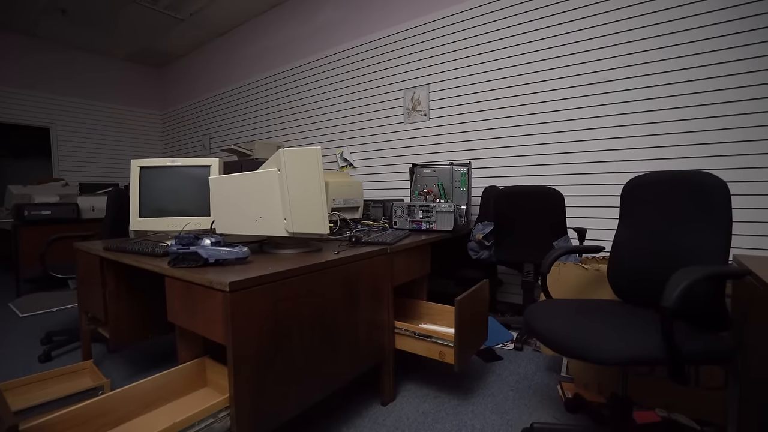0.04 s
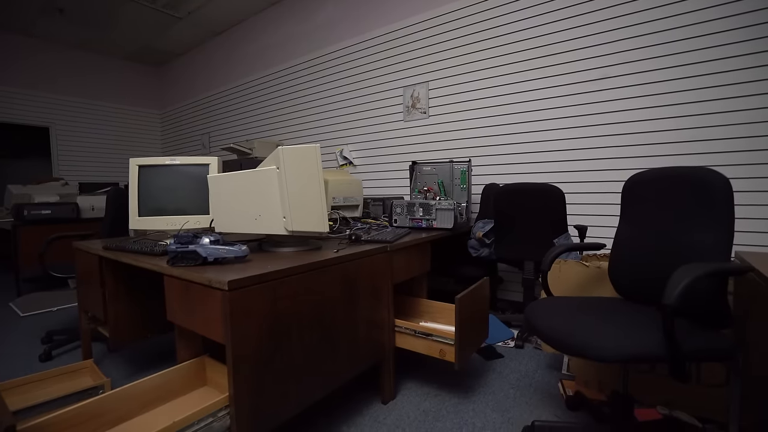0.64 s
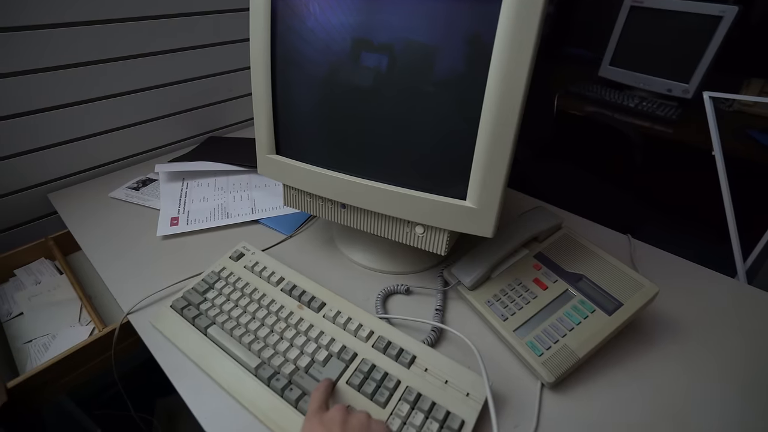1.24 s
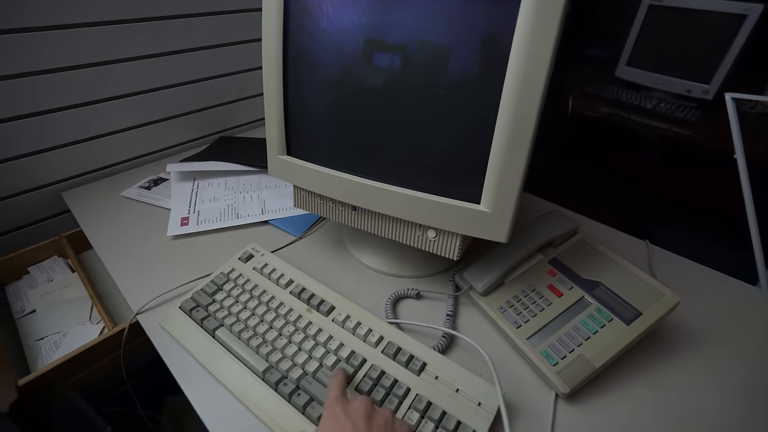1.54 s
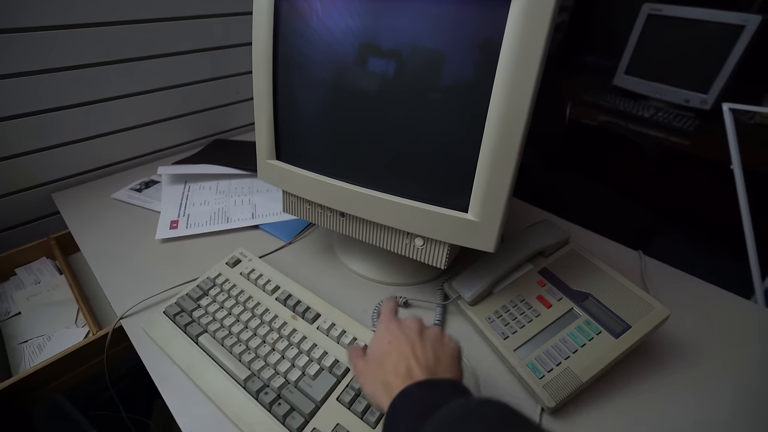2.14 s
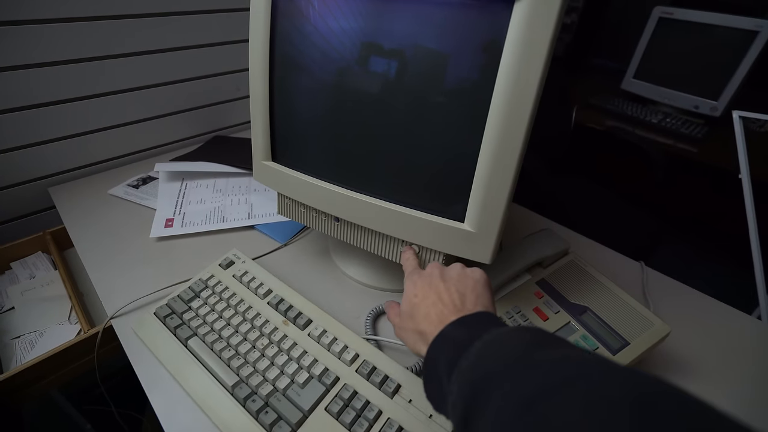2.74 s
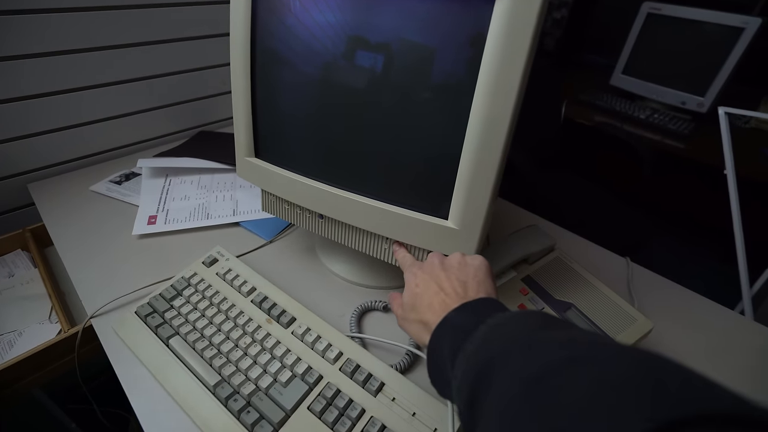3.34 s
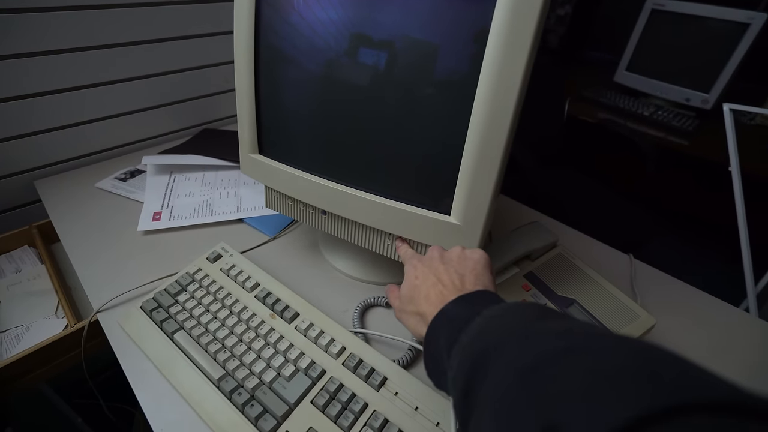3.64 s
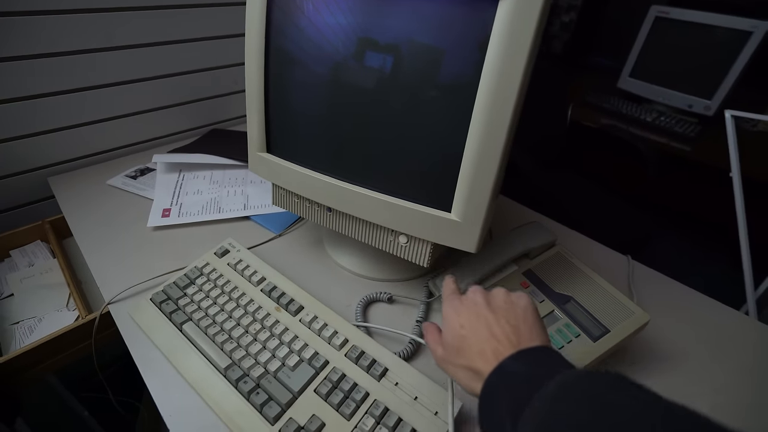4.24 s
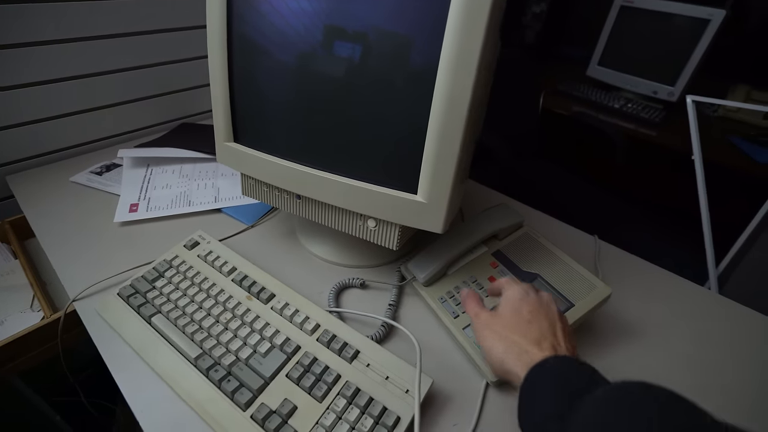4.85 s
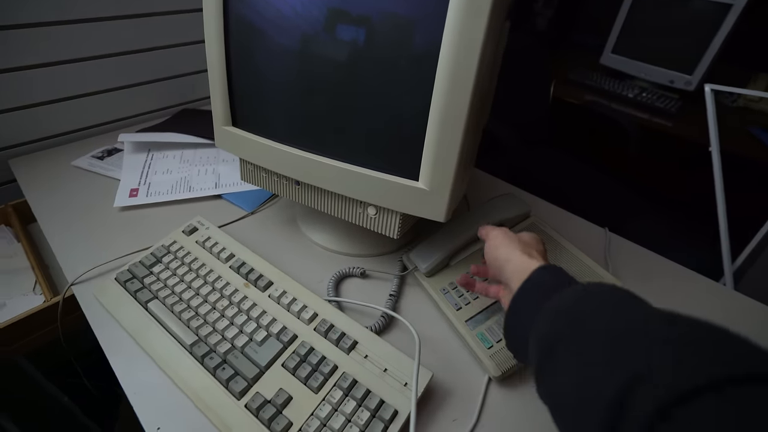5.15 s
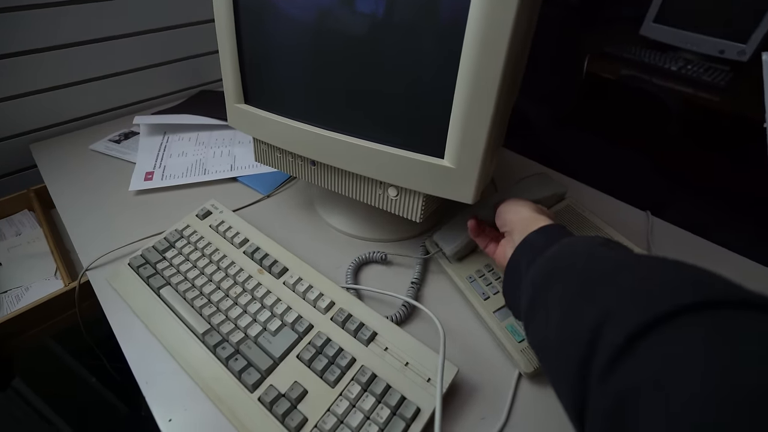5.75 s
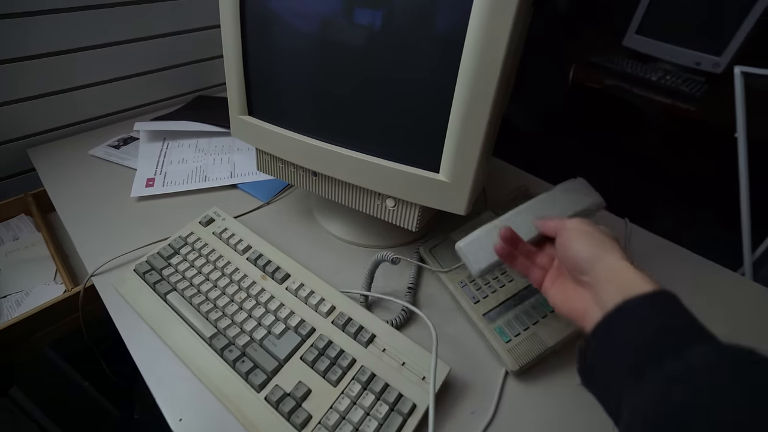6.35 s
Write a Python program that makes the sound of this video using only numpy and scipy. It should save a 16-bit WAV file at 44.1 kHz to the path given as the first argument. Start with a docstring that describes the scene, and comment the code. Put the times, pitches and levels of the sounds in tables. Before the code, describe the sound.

In a quiet office with faint building rumble and hiss, a hand tries old equipment near the microphone. First come slow, light taps on a keyboard, then a soft bump and a rustle of cloth. A monitor's power button rocks and snaps unevenly in its hollow case. After a pause and brief finger scrapes, a phone handset is lifted with a plastic knock and light clicks.

```python
"""Keyboard keys tick and land under a hand trying dead equipment on a desk in a quiet, empty office.
The hand then jiggles a tube monitor's power button, knocks a corded phone's handset loose and lifts it.
Each contact is a sharp crack, a short ring of the plastic shell, a desk thump and a little room.
In between: a sleeve rustles, fingers scrape plastic, something soft is nudged.
Faint building rumble and hiss lie underneath."""
import sys
import numpy as np
from scipy import signal
from scipy.fft import rfft, irfft
from scipy.io import wavfile
from scipy.ndimage import uniform_filter1d

SR = 44100
rng = np.random.default_rng(int(sys.argv[2]) if len(sys.argv) > 2 else 0)


def log_audio(samples):
    """Write samples as a 16-bit WAV file to the path given in sys.argv[1]."""
    # one column per channel
    frames = np.atleast_2d(samples).T
    # limit to full scale, then quantise
    limited = np.clip(frames, -1, 1)
    pcm = np.round(limited * 32767).astype(np.int16)
    wavfile.write(sys.argv[1], SR, pcm)


N = 291501
HIT_T_S = np.arange(int(.6 * SR)) / SR
ATTACK_SAMPLES = int(.03 * SR)

# keystrokes: (landing time [s], level [dB], spot [Hz], hardness [dB], ping [dB], extra thump [dB],
# second tick's lead [s], its level [dB])
KEYSTROKES = [(.889, -39.5, 1700, -8.5, 0, 4.5, 0.019, -62.5), (1.0725, -44, 944, 8, -1, 0.5, 0.012, -59),
              (1.537, -46.5, 713, 0, 1.5, -2, .011, -50),
              (2.0384, -44.5, 2940, 0.5, 5.5, -0.5, 0.014, -48.5)]
# keycap touches, button rocks, latch snaps: (time [s], level [dB], spot [Hz], hardness [dB], weight [dB])
KEY_TOUCHES = [(.611, -64.5, 980, 3.5, -8), (1.266, -60, 675, -1, 13.5), (1.685, -54, 1380, -1, -13),
               (1.8013, -52, 1410, -1.5, -1.5), (1.905, -66.5, 1670, -7, 10.5)]
BUTTON_ROCKS = [(2.879, -49, 690, 2, -5), (2.925, -53.5, 670, 2, -4), (2.998, -52.5, 635, 0, -1.5),
                (3.05, -55, 1220, 2.5, 0), (3.172, -57.5, 1120, 10.5, 5.5), (3.2245, -43.5, 1260, -17, 0),
                (3.505, -62, 685, -14, 17.5), (3.856, -56.5, 656, -14, 6)]
LATCH_SNAPS = [(2.558, -51.5, 1180, -0.5, -5.5), (3.093, -50, 1210, 4.5, 5), (3.288, -38.5, 955, -6, -.5),
               (3.363, -64.5, 766, 16.5, 13), (3.6994, -46, 640, -2.5, -6), (3.9116, -48.5, 650, 1, 3.5),
               (4.009, -47, 1440, -4.5, -8.5), (4.021, -41, 1210, -10.5, -17)]
# handset on cradle: (time [s], level [dB], spot [Hz], hardness [dB], weight [dB], ring length [x])
CRADLE_KNOCKS = [(5.725, -31.5, 1090, -3, -4.5, 0.48), (5.902, -39.5, 1010, -3.5, 1, 0.97),
                 (5.922, -49, 800, -1, 7.5, 0.7), (5.979, -47, 1560, 8.5, 9, 1.3),
                 (5.991, -53, 593, 19, -4, 0.66)]
# handset in hand: (time [s], level [dB], hardness [dB])
HANDSET_CLICKS = [(5.701, -56.5, 6.5), (6.168, -64, -12), (6.189, -58.5, -10), (6.384, -74.5, 28.5),
                  (6.429, -52, -2.5), (6.453, -52.5, -0.5), (6.5594, -55.5, 3.5), (6.5796, -51.5, 18)]

# contact kinds: (colour per band [dB], thump [dB], crack over ring [dB], ring length [x],
# upper resonance [Hz], hardness per octave of its rise [dB], left over right [dB])
KEY_TOUCH = dict(colour_db=[-9, 0, 1, -14.5],
             thump_db=-17.5, crack_db=-1.5, length=0.75, upper_hz=2570, octave_db=40, pan_db=.5)
KEY_TICK = dict(colour_db=[-6.5, -2.5, -0.5, -13],
            thump_db=-25, crack_db=-4, length=0.64, upper_hz=2620, octave_db=60, pan_db=.5)
KEY_LANDING = dict(colour_db=[-3, 1, -2, -9],
               thump_db=-11, crack_db=-3.5, length=0.81, upper_hz=3420, octave_db=13.5, pan_db=0.1)
BUTTON_ROCK = dict(colour_db=[-10.5, 0.5, -9, -21],
               thump_db=-25, crack_db=-6.5, length=0.88, upper_hz=2000, octave_db=200, pan_db=-0.3)
LATCH_SNAP = dict(colour_db=[-6.5, -1, -2.5, -7],
              thump_db=-30.5, crack_db=-13, length=0.8, upper_hz=3110, octave_db=200, pan_db=-0.5)
CRADLE_KNOCK = dict(colour_db=[-3.5, 0, -9, -19],
                thump_db=-8, crack_db=-3.5, length=0.77, upper_hz=2180, octave_db=90, pan_db=-1.2)
HANDSET_CLICK = dict(colour_db=[-4.5, 1.5, 1, -13.5],
                 thump_db=-14, crack_db=-1, length=1, upper_hz=2380, octave_db=39, pan_db=1.5)
DRY_TICK = dict(colour_db=[-22, -29, -28, 0.5],
            thump_db=-20, crack_db=8, length=.25, upper_hz=5200, octave_db=40, pan_db=0)

# plastic resonances: (frequency [Hz], width [Hz], gain [dB])
KEYBOARD_MODES = [(325, 19.6, -2.5), (440, 65, -3), (561, 64, 3), (716, 69, -7), (1031, 96, -1.5),
                  (1365, 110, -5.5), (2720, 81, -7.5), (3340, 17, -11), (6600, 300, -14)]
MONITOR_MODES = [(321, 32, -11.5), (392, 35, -0.5), (535, 25, -2.5), (677, 16, 5), (926, 42, -6),
                 (1232, 11.4, -1), (1910, 36, -8), (2057, 45, -2.5), (2800, 38, -4), (3200, 24, -8),
                 (5470, 940, -4)]
PHONE_MODES = [(317, 24, 10), (403, 22, 1), (517, 35, 7), (814, 28, 6.5), (973, 75, 7), (1130, 21, -2),
               (1278, 33, 0.5), (1435, 33, 6), (2360, 260, 11.5), (2850, 200, 7), (5700, 1200, 5)]
SCRAPE_MODES = [(2040, 230, 9), (2680, 590, 2), (3700, 190, -5)]
# desk top: (frequency [Hz], t60 [s], gain under keyboard or monitor [dB], gain under phone [dB])
DESK_MODES = [(84, 0.72, -3, -18), (107.8, 0.46, -5, -7.5), (119.4, 0.31, 3, -9), (136.4, 0.19, -2.5, -17),
              (192.5, 0.17, -13, -10), (223.8, 0.43, -6.5, -23)]
# low, mid, bright and treble band: (low edge [Hz], high edge [Hz])
BANDS_HZ = [(200, 600), (600, 1800), (1800, 4600), (4600, 16000)]
# decay per band: (base shell t60 [s], room t60 [s], base room level [dB])
BAND_DECAYS = [(0.15, 0.47, -8), (0.16, 0.49, -13.5), (0.099, 0.42, -15), (0.12, 0.35, -9)]
# band response to hardness, weight and ping: (low, mid, bright, treble) [dB/dB]
HARDNESS_SHARE = [0, 0, .45, 1]
WEIGHT_SHARE = [1, 0, 0, 0]
PING_SHARE = [0, 0, 1, 0]

# soft bumps: (time [s], envelope peak [dB], frequency [Hz])
BUMPS = [(2.162, -39.5, 229), (2.198, -50, 175), (6.5076, -32.5, 630)]
# sleeve slides, finger scrapes: (start [s], length [s], level [dB])
ARM_MOVES = [(2.13, 0.35, -58.5), (2.57, 0.36, -62), (5.04, 0.88, -66.5)]
SCRAPES = [(0.728, 0.072, -69), (1.861, 0.051, -61), (5.363, 0.067, -56.5), (5.549, 0.058, -57),
           (5.598, 0.063, -60)]
# office air spectrum: (frequency [Hz], relative density [dB])
AIR_SPECTRUM = [(12, -64), (20, 2.5), (74, -6), (113, -4), (177, -6), (277, -10), (328, -9), (434, -9),
                (574, -9.5), (718, -10), (1660, -17.5), (2460, -19), (4180, -20), (16000, -27)]
# its loudness: (time [s], level [dB])
AIR_LEVELS = [(0, -67.5), (.45, -64), (4.6, -64), (6.6, -60.5)]
# its width: (frequency [Hz], side over mid [dB])
AIR_WIDTH = [(30, -30), (150, -9.5), (500, -5), (1500, 2), (5000, -0.5), (15000, -2)]


def keyboard(tick_gap_s=.019, first_tick_db=-6, cap_hz=900):
    """A loose keycap ticks when brushed, and twice on its way before each key lands."""
    blows = [blow(KEY_TOUCH, *touch) for touch in KEY_TOUCHES]
    for s, db, spot_hz, hardness_db, ping_db, desk_db, lead_s, tick_db in KEYSTROKES:
        blows += [blow(KEY_TICK, s - lead_s - tick_gap_s, tick_db + first_tick_db, cap_hz),
                  blow(KEY_TICK, s - lead_s, tick_db, cap_hz, ping_db=2),
                  blow(KEY_LANDING, s, db, spot_hz, hardness_db, ping_db=ping_db, desk_db=desk_db)]
    return contacts(blows, KEYBOARD_MODES, bed_db=0.5, spot_db=5, tone_db=-3.5, hold_s=0.01,
                    crack_s=0.00076, crack_colour_db=[-11.5, -1, -2, -27])


def power_button():
    """The button rocks dully and its latch snaps crisply in the monitor's hollow case."""
    blows = [blow(BUTTON_ROCK, *rock) for rock in BUTTON_ROCKS]
    blows += [blow(LATCH_SNAP, *snap) for snap in LATCH_SNAPS]
    return contacts(blows, MONITOR_MODES, bed_db=-4.5, spot_db=-2.5, tone_db=-15, hold_s=0.0045,
                    crack_s=0.00061, crack_colour_db=[4.5, 0.5, 2, -1])


def phone(spot_hz=1650):
    """The handset knocks loose from its cradle, then clicks in the hand as it is lifted."""
    blows = [blow(CRADLE_KNOCK, *knock) for knock in CRADLE_KNOCKS]
    blows += [blow(HANDSET_CLICK, s, db, spot_hz, hardness_db) for s, db, hardness_db in HANDSET_CLICKS]
    blows += [blow(DRY_TICK, s=5.0805, db=-58.5, spot_hz=spot_hz)]   # the hand reaches out
    return contacts(blows, PHONE_MODES, bed_db=7, spot_db=7, tone_db=-11, hold_s=0.0011,
                    crack_s=0.00082, crack_colour_db=[-1, -4.5, -3.5, -0.5], on_phone=True)


def blow(kind, s, db, spot_hz, hardness_db=0, weight_db=0, ring=1, ping_db=0, desk_db=0):
    """One contact's settings: hardness brightens, weight adds body and thump, ping sharpens the crack."""
    shift_db = np.dot([hardness_db, weight_db, ping_db], [HARDNESS_SHARE, WEIGHT_SHARE, PING_SHARE])
    levels_db = db + np.array(kind["colour_db"]) + shift_db
    upper_hz = kind["upper_hz"] * 2 ** (hardness_db / kind["octave_db"])
    thump_db = db + kind["thump_db"] + weight_db + desk_db
    crack_db = kind["crack_db"] + ping_db
    return s, thump_db, levels_db, crack_db, kind["length"] * ring, spot_hz, upper_hz, kind["pan_db"]


def contacts(blows, modes, bed_db, spot_db, tone_db, hold_s, crack_s, crack_colour_db, on_phone=False):
    """Each blow cracks, rings the shell and the struck spot, and thumps the desk."""
    out = np.zeros((2, N))
    for s, thump_db, levels_db, crack_db, length, spot_hz, upper_hz, pan_db in blows:
        excited = list(modes) + [(spot_hz, spot_hz / 9, spot_db), (upper_hz, upper_hz / 11, spot_db - 7)]
        noise = rng.standard_normal((2, len(HIT_T_S) + ATTACK_SAMPLES))
        ring = widen(*shell(noise, excited, bed_db)[:, ATTACK_SAMPLES:], width=0.86)
        tones = mode_tones(excited)
        snap = crack(spot_hz, upper_hz, crack_s)
        fading_s = np.maximum(HIT_T_S - hold_s * length, 0)   # nearby surfaces hold the ring up briefly
        hit = 0
        for (low_hz, high_hz), db, edge_db, decay in zip(BANDS_HZ, levels_db, crack_colour_db,
                                                         BAND_DECAYS):
            shell_t60_s, room_t60_s, room_db = decay
            fade = from_db(-60 * fading_s / (shell_t60_s * length))
            room = length * from_db(room_db - 60 * HIT_T_S / room_t60_s)
            swell = 1 - np.exp(-HIT_T_S * low_hz / 2)   # low bands build slower
            body = unit_attack(ring * np.hypot(fade, room)) + from_db(tone_db) * unit_attack(tones)
            body = unit_attack(band(body * swell, low_hz, high_hz, order=5))
            edge = unit_attack(band(snap, low_hz, high_hz, order=4))
            hit = hit + from_db(db) * unit_attack(body + from_db(crack_db + edge_db) * edge)
        pan = from_db([[pan_db / 2], [-pan_db / 2]])
        add(out, s, hit * pan + from_db(thump_db) * desk_thump(on_phone))
    return out


def crack(spot_hz, upper_hz, decay_s):
    """The first instant: a gritty click and a few hard cycles of the struck spot."""
    fade = np.exp(-HIT_T_S / decay_s)
    upper = np.sin(2 * np.pi * upper_hz * HIT_T_S) * fade
    lower = np.sin(2 * np.pi * spot_hz * HIT_T_S) * np.exp(-HIT_T_S / (2 * decay_s))
    grit = rng.standard_normal((2, len(HIT_T_S))) * fade
    grit = signal.sosfilt(signal.butter(1, 6500, fs=SR, output="sos"), grit)   # plastic gives a little
    return widen(upper + .5 * lower + 1.47 * grit[0], grit[1], width=1.3)


def shell(drive, modes, bed_db):
    """A plastic case: a few strong resonances over a smooth bed that stands for countless weak ones."""
    out = from_db(bed_db) * signal.lfilter([.4], [1, -.6], drive)
    for hz, width_hz, db in modes:
        r = np.exp(-np.pi * width_hz / SR)
        peak = signal.lfilter([1, 0, -1], [1, -2 * r * np.cos(2 * np.pi * hz / SR), r * r], drive)
        out = out + from_db(db) * peak * (1 - r * r) / 2
    return out


def mode_tones(modes):
    """Resonances ring on as clean tones; the narrower, the longer."""
    out = 0
    for hz, width_hz, db in modes:
        phase = rng.uniform(0, 2 * np.pi) + np.array([[1], [-1]]) * rng.normal(0, min(hz / 2500, 1))
        tone = np.sin(2 * np.pi * hz * HIT_T_S + phase)
        fade = np.exp(-.6 * np.pi * width_hz * HIT_T_S)
        out = out + from_db(db) * np.sqrt(width_hz) * tone * fade
    return out


def desk_thump(on_phone, rise_s=0.01, rumble_db=-9.5, rumble_t60_s=0.69):
    """The desk top swings up, then rings low; the room answers with a loose rumble."""
    rings = 0
    for hz, t60_s, keyboard_db, phone_db in DESK_MODES:
        db = (phone_db if on_phone else keyboard_db) + rng.standard_normal()
        rings = rings + from_db(db - 60 * HIT_T_S / t60_s) * np.sin(2 * np.pi * hz * HIT_T_S)
    rumble = band(rng.standard_normal(len(HIT_T_S)), 60, 240, order=2)
    rumble *= from_db(-60 * HIT_T_S / rumble_t60_s)
    thump = unit_rms(rings) + from_db(rumble_db) * unit_rms(rumble)
    thump = band(thump * (1 - np.exp(-HIT_T_S / rise_s)), 78, 600, order=2)
    return thump / np.sqrt(np.mean(thump[:2 * ATTACK_SAMPLES] ** 2))


def bumps(damping_cycles=0.32):
    """Something soft is nudged: one or two low cycles, no ring."""
    out = np.zeros((2, N))
    for s, db, hz in BUMPS:
        age = HIT_T_S * hz / damping_cycles
        add(out, s, from_db(db) * np.sin(2 * np.pi * hz * HIT_T_S) * age * np.exp(1 - age))
    return out


def sleeve(skew=0.59, hiss_db=-4.5):
    """Cloth slides as the arm moves: a dull rub and a fine hiss swell early and fade together."""
    t = np.arange(N) / SR
    mid, side = friction(grain_db=1.5)
    rub = unit_rms(band(stereo(mid, 0.6 * side), 297, 1670, order=2))
    hiss = unit_rms(band(stereo(mid, 0.98 * side), 1150, 5500, order=1))
    speed = sum(from_db(db) * np.sin(np.pi * np.clip((t - s) / length_s, 0, 1) ** skew)
                for s, length_s, db in ARM_MOVES)
    return speed * (rub + from_db(hiss_db) * hiss)


def fingers():
    """Skin drags over plastic in short strokes and excites its upper resonances."""
    t = np.arange(N) / SR
    mid, side = friction(grain_db=4.5)
    strokes = sum(from_db(db) * np.sqrt(np.maximum(1 - (2 * (t - s) / length_s - 1) ** 2, 0))
                  for s, length_s, db in SCRAPES)
    return strokes * unit_rms(shell(stereo(mid, 0.68 * side), SCRAPE_MODES, bed_db=-17))


def friction(grain_db):
    """Mid and side noise broken into tiny uneven slips."""
    slips = unit_rms(uniform_filter1d(rng.standard_normal(N), size=180))
    return rng.standard_normal((2, N)) * from_db(grain_db * slips)


def office_air():
    """Faint building rumble, alike in both ears, under a wide hiss."""
    hz = np.arange(N // 2 + 1) * SR / N
    mid, side = rfft(rng.standard_normal((2, N))) * from_db(at_hz(AIR_SPECTRUM, hz))
    air = irfft(stereo(mid, side * from_db(at_hz(AIR_WIDTH, hz))), N)
    level_db = np.interp(np.arange(N) / SR, *np.transpose(AIR_LEVELS))
    return unit_rms(air) * from_db(level_db)


def from_db(db):
    """Decibels to gain."""
    return 10 ** (np.asarray(db) / 20)


def unit_rms(x):
    """Scale to rms 1."""
    return x / np.sqrt(np.mean(x ** 2) + 1e-20)


def unit_attack(x):
    """Scale to rms 1 over the first 30 ms."""
    return x / np.sqrt(np.mean(x[..., :ATTACK_SAMPLES] ** 2) + 1e-20)


def band(x, low_hz, high_hz, order):
    """Causal band-pass."""
    return signal.sosfilt(signal.butter(order, [low_hz, high_hz], "band", fs=SR, output="sos"), x + 1e-18)


def at_hz(points, hz):
    """Read a spectrum on a log-frequency axis."""
    points_hz, points_db = np.transpose(points)
    return np.interp(np.log(hz + 1), np.log(points_hz), points_db)


def stereo(mid, side):
    """Mid and side to left and right."""
    return np.array([mid + side, mid - side])


def widen(mid, side, width):
    """Left and right: alike in the bass, parting towards the treble."""
    side = signal.sosfilt(signal.butter(1, 2000, "high", fs=SR, output="sos"), side)
    return stereo(mid, width * side)


def add(out, s, sound):
    """Mix a hit in at time s."""
    start = int(s * SR)
    out[:, start:start + len(HIT_T_S)] += sound[..., :N - start]


def scene():
    """Keyboard, monitor button and phone in turn, over the still room."""
    return keyboard() + power_button() + phone() + bumps() + sleeve() + fingers() + office_air()


def record(dry):
    """Steep low-pass at 15.9 kHz."""
    return signal.sosfilt(signal.ellip(10, .1, 70, 15900, fs=SR, output="sos"), dry)


dry = scene()
out = record(dry)
log_audio(out)
```